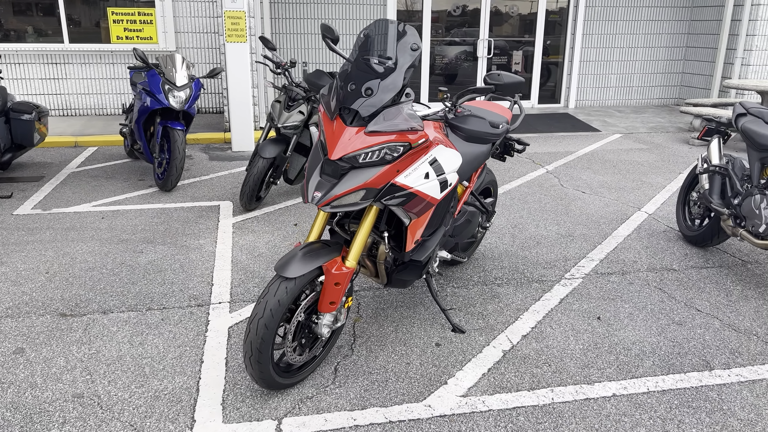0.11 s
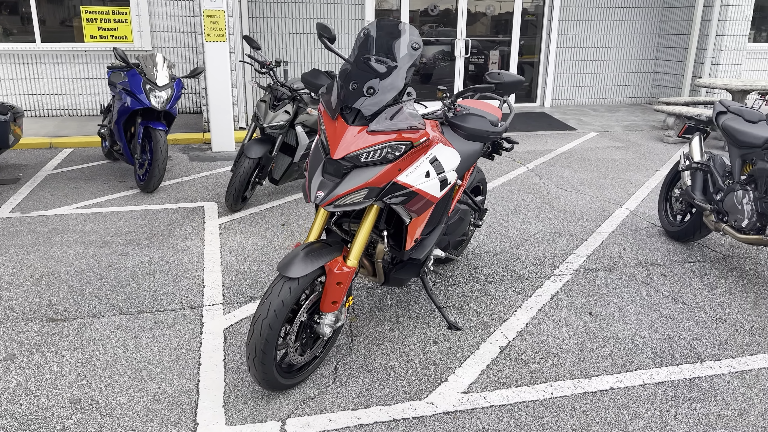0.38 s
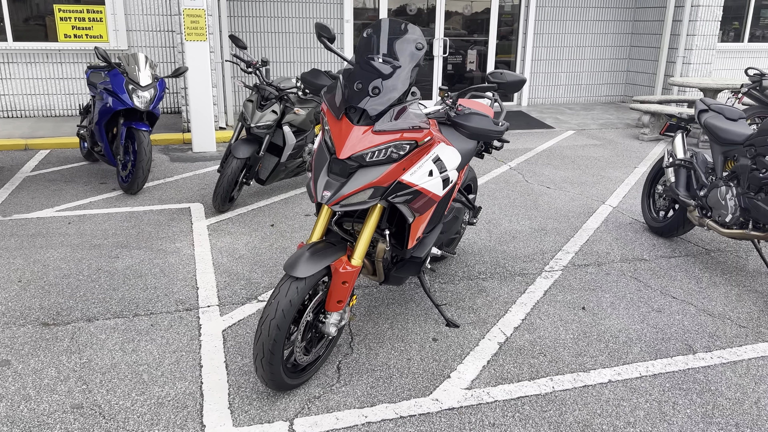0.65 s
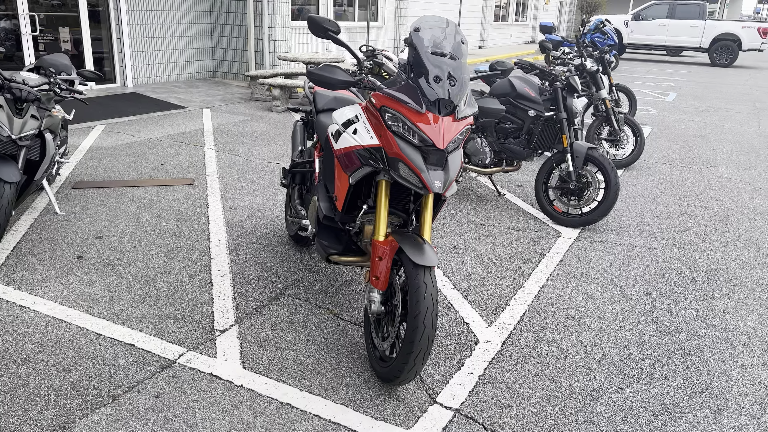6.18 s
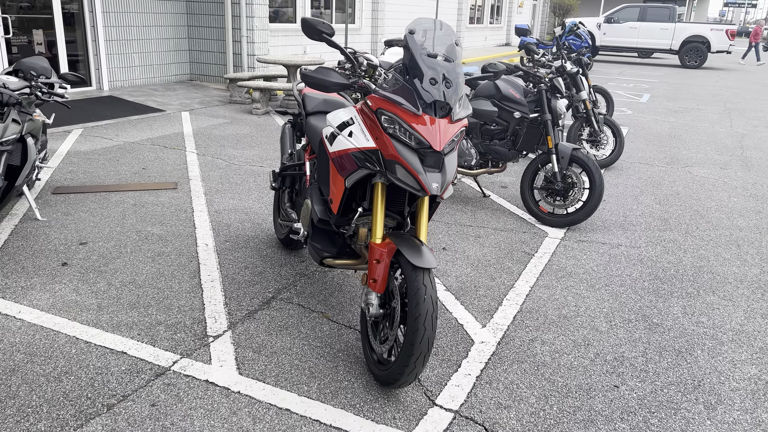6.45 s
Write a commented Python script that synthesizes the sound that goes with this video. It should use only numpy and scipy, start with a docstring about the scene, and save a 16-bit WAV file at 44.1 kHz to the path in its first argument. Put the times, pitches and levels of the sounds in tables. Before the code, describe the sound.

Outdoors in a car park, gusty wind strikes a hand-held stereo microphone with low buffeting, fluttering and dense irregular pops, strongest around the middle. A few tiny taps touch the case early, and an idling engine ticks very faintly to the right. Behind it, soft road roar and tyre hiss slowly grow; the pops thin out and a vehicle's low exhaust drone swells close by in the final second.

```python
"""Gusty wind buffets and pops on the two ports of a hand-held stereo microphone in a car park.
Shaped noise makes the wind, brief wave packets its pops, and damped sines a few taps on the case.
An idling engine ticks faintly to the right as hiss pulses. A vehicle draws near on the road: noise bands
for roar and hiss, with sine tones for the swelling exhaust drone. The recorder's bass filters smear every
pop into a short falling chirp."""
import sys
import numpy as np
from scipy import signal
from scipy.fft import rfft, irfft, next_fast_len
from scipy.io import wavfile
from scipy.ndimage import uniform_filter1d, map_coordinates

SR = 44100
rng = np.random.default_rng(int(sys.argv[2]) if len(sys.argv) > 2 else 0)


def wav_out(sig):
    """Save sig, one row per channel (or a flat mono array), as 16-bit PCM at SR to the path in sys.argv[1]."""
    wavfile.write(sys.argv[1], SR, np.round(np.clip(np.atleast_2d(sig).T, -1, 1) * 32767).astype(np.int16))


def field_ratio(decibels):
    """Amplitude ratio for a level in dB (20 dB per decade); scalars and array-likes work."""
    return 10 ** (np.asarray(decibels, dtype=float) / 20)


N = 289737

# gust strength at the ports: (time [s], buffet level [dB])
GUSTS = [(0, -34), (.2, -30), (.45, -25), (.66, -29.5), (.75, -27), (1.2, -25), (1.36, -29.5), (1.6, -24),
         (1.88, -28.5), (2.2, -19.5), (2.33, -27.5), (2.5, -19), (2.63, -25.5), (2.88, -23.5), (3.12, -29),
         (3.62, -30.5), (3.93, -28.5), (4.57, -28.5), (4.87, -29.5), (5.1, -33), (5.6, -26), (6.57, -26.5)]
# wind spectra: (frequency [Hz], relative level [dB])
BUFFET_SPECTRUM = [(15, -62.5), (25, -15.5), (45, -2), (69, 3), (144, -7), (188, -6.5), (400, -17.5),
                   (520, -33.5), (880, -120)]
FLUTTER_SPECTRUM = [(150, -17.5), (300, -3.5), (450, -4.5), (800, -8), (1500, -13.5), (4000, -120)]
# likeness of the two ports, for wind and for distant sounds: (frequency [Hz], correlation [-1 to 1])
WIND_ALIKE = [(60, 0.66), (300, 0.58), (900, 0.91)]
FAR_ALIKE = [(100, 0.81), (500, 0.2), (2000, 0.22), (5000, 0.3), (8000, 0.23)]
# distance of the vehicle: (time [s], distance [m])
DISTANCE = [(0, 40), (.72, 38.5), (2.08, 32.5), (2.3, 32.8), (3.04, 28.1), (4.31, 21.2), (5.11, 23.4),
            (5.52, 15.6), (6.57, 17.9)]
# where the vehicle is heard: (time [s], lag of the right port [ms])
BEARING = [(0, -0.59), (5.9, -0.43), (6.1, 0.34)]
# spectra of road roar, tyre sizzle, exhaust rumble, traffic growl above it, and a brighter rush
# of air and tyres: (frequency [Hz], relative level [dB])
ROAR_SPECTRUM = [(200, -37), (500, -14.5), (700, -5.5), (950, 2), (1500, -6.5), (2200, -8.5), (2900, -14),
                 (3500, -26), (7000, -120)]
SIZZLE_SPECTRUM = [(1000, -120), (2500, -32), (3200, -5), (4200, -6), (5200, -9.5), (7200, -12.5),
                   (9300, -21), (11400, -18), (13400, -35.5), (15500, -27)]
RUMBLE_SPECTRUM = [(25, -44), (60, -14), (110, 1.5), (240, 3), (330, -12), (600, -12), (2500, -120)]
GROWL_SPECTRUM = [(150, -51), (280, -3), (380, 5.5), (480, -3.5), (700, -20), (2500, -120)]
WHOOSH_SPECTRUM = [(1200, -43), (1900, 3), (2700, -2.5), (3600, -13.5), (6000, -37)]
# exhaust rumble, and low growl of traffic above it: (time [s], rumble level [dB], growl level [dB])
RUMBLE_AND_GROWL = [(0, -40, -33), (.6, -73.5, -40), (3.3, -61, -49.5), (3.85, -35, -35), (5.05, -35, -59),
                    (5.22, -42, -32), (5.42, -22.5, -33), (6.0, -25.5, -36.5), (6.2, -25.5, -50),
                    (6.57, -20.5, -29)]
# rises of the brighter rush: (time [s], half width [s], peak level [dB])
WHOOSHES = [(3.62, 0.22, -45.5), (4.66, .07, -46.5), (5.3, 0.12, -43.5)]
# swell of the roar as the vehicle passes: (time [s], half width [s], gain [dB])
ROAR_SWELL = (6.35, 0.29, 4.5)
# ticking of the idling engine: (time [s], level [dB])
IDLE_LEVEL = [(0, -94), (.6, -66.5), (1.2, -70), (1.6, -76), (1.82, -61), (1.95, -69.5), (2.1, -61.5),
              (2.4, -77), (3.0, -90)]
# its speed, settling: (time [s], turns a second [Hz])
IDLE_SPEED = [(1, 21.4), (1.06, 20.9)]
# tone of its ticks: (frequency [Hz], relative level [dB])
TICK_SPECTRUM = [(2000, -24), (4000, 2.5), (6500, 2.5), (8000, -2.5), (11500, -2.5), (14000, -21.5)]
# single eddies bursting, levels before the trims in pops():
# (time [s], thump level [dB], snap level [dB], snap pitch [Hz])
POPS = [(0.211, -12, -14.5, 360), (0.434, -21, -12, 393), (0.518, -13, -15, 410), (0.528, -14, -13, 566),
        (0.568, -25, -13, 450), (0.599, -31, -13.5, 450), (0.693, -16, -9, 627), (0.718, -5, -11, 400),
        (0.727, -15.5, -11.5, 353), (0.743, -28, -16, 610), (0.771, -23, -18, 580),
        (0.828, -22, -14.5, 450), (0.841, -7.5, -28, 427), (0.89, -11.5, -18.5, 500),
        (0.988, -28, -14.5, 460), (1.015, -15, -11, 420), (1.027, -27, -12.5, 600), (1.05, -17, -12, 458),
        (1.075, -10.5, -26, 383), (1.116, -29, -17.5, 493), (1.176, -16.5, -14.5, 480),
        (1.203, -13, -27, 430), (1.269, -16.5, -19.5, 470), (1.451, -9.5, -13, 430),
        (1.472, -13, -6.5, 476), (1.517, -17.5, -9.5, 358), (1.551, -8, -12, 380), (1.676, -19.5, -15, 510),
        (1.793, -9, -16.5, 520), (1.905, -24, -17.5, 493), (1.966, -11, -17.5, 530), (2.003, -24, -20, 600),
        (2.027, -21.5, -11, 644), (2.067, -25, -11, 507), (2.081, -26.5, -15.5, 492),
        (2.118, -26.5, -15.5, 650), (2.189, -15, -12.5, 410), (2.22, -17.5, -16, 434),
        (2.328, -5.5, -10.5, 470), (2.545, -1.5, 0.5, 390), (2.564, 4.5, -3, 373), (2.669, -15, -9, 476),
        (2.684, -19, -6.5, 620), (2.719, -15, -17, 435), (2.757, -19.5, -11, 515),
        (2.825, -14.5, -25.5, 343), (2.866, -6.5, -24, 290), (2.992, 2, -12.5, 317),
        (3.032, -14.5, -9, 530), (3.207, -8, -11, 344), (3.261, -10, -16, 500), (3.975, -17.5, -16.5, 523),
        (4.266, -22, -18.5, 423), (4.553, -13, -17, 320), (4.673, -18, -14.5, 340), (4.716, -22, -10, 393),
        (4.947, -8.5, -15.5, 330), (5.513, -5, -40, 380), (5.87, -7.5, -17, 292), (6.411, -5, -18.5, 450)]
# taps on the case: (time [s], pitch [Hz], level before onset and decay [dB])
KNOCKS = [(1.029, 1650, -24), (1.968, 1500, -30), (2.018, 1700, -29)]
# exhaust tones: (start [s], length [s], multiple of the cycle rate, level [dB])
EXHAUST = [(2.215, 0.23, 6, -23.5), (4.197, 0.25, 9, -32), (4.736, 0.2, 6, -33.5), (5.117, 0.26, 9, -32),
           (5.378, 0.23, 6, -28), (5.459, 0.62, 5, -25.5), (5.5, 0.16, 9, -31.5), (5.56, 0.49, 3, -19.5),
           (5.892, 0.34, 2, -25), (5.995, 0.36, 9, -32), (6.113, 0.4, 3, -20), (6.334, 0.65, 5, -25),
           (6.39, 0.16, 7, -28)]
# engine cycle rate of the vehicle: (time [s], rate [Hz])
CYCLE = [(2.3, 30.42), (4.3, 30.05), (5.2, 29.6), (5.8, 30.38), (6.57, 28.95)]
# the microphone body: (frequency [Hz], left minus right [dB])
TILT = [(300, 0), (650, -1.5), (1100, 1.5), (2300, 2.5), (3500, -1), (5500, -6.5), (7500, -2.5),
        (9000, -0.5)]
# treble lost from the centre (above 0) or from the sides (below 0): (frequency [Hz], loss [dB])
TREBLE_LOSS = [(8500, 0), (9100, 11.5), (10100, 14), (10700, -0.5), (11300, -18), (12300, -20.5),
               (13000, 4.5)]

PORT_MS = -0.49  # lag of the right port for sounds from the road; negative means it hears them first
FLUTTER_DB, FLUTTER_GROWS = -37, 0.95  # level in a middling gust; dB of swing for each dB of gust
LULL_DB, FLUTTER_LUMPS_DB = 5, 2.4  # swing of the wind, and of the flutter on top, for each unit of wobble
LUMP_TOP = .5  # how far the wobble may rise in a lump of wind
VEER_S, CONTRARY = 2.5, .25  # bursts strike from the right, then from the left; share that do the opposite
SURE_DB = -9  # listed snaps at or above this always come with the wind
LEFT_FIRST_MS, RIGHT_FIRST_MS = 0.43, 0.21  # how long a burst takes to reach the other port
SHARPEN_PER_DB = .006  # harder snaps are shorter: cycles lost for each dB
SPIT_DB = -16  # a brighter edge an octave above each snap, against its listed level
ROAR_DB = -31  # at 10 m, before the swell
SIZZLE_DB, SIZZLE_LOSS_DB_PER_M = -38.5, 0.282  # at 10 m before the loss; extra treble loss on the way
WAVER_DB, TICK_SCATTER_DB = 1.2, 1.5  # unsteadiness of the engine and traffic; of the tick sizes
FIRST_TICK_S = .103  # when the idling engine begins to turn over


def unit(x):
    """Scaled to rms 1."""
    return x / np.sqrt(np.mean(x ** 2) + 1e-20)


def along(points, hz):
    """Value at each frequency between (Hz, value) points on a log axis."""
    f, v = np.transpose(points)
    return np.interp(np.log(hz + 1), np.log(f + 1), v)


def curves(rows):
    """One value per sample for each column after the time."""
    s, *cols = np.transpose(rows)
    return [np.interp(np.arange(N) / SR, s, c) for c in cols]


def wobble(rate):
    """A smooth random curve, rate knots a second."""
    knots = rng.standard_normal(int(N * rate / SR) + 4)
    return map_coordinates(knots, [np.arange(N) * rate / SR])


def filtered(x, response):
    """x times a complex response of frequency."""
    m = next_fast_len(N + SR // 2)
    return irfft(rfft(x, m) * response(np.fft.rfftfreq(m, 1 / SR)), m)[..., :N]


def shaped(x, spectrum):
    """x given the levels of a spectrum table."""
    return filtered(x, lambda hz: field_ratio(along(spectrum, hz)))


def ports(pair, alike):
    """Two unrelated signals mixed so that left and right are alike by the given share."""
    turn = lambda hz: np.arccos(np.clip(along(alike, hz), -1, 1)) / 2
    mid, side = filtered(pair, lambda hz: np.array([np.cos(turn(hz)), np.sin(turn(hz))]))
    return np.array([mid + side, mid - side])


def lagged(x, ms):
    """The right port hears it ms later, half the lag on each side."""
    shift = ms * SR / 2000
    left = map_coordinates(x[0], [np.arange(N) + shift])
    right = map_coordinates(x[1], [np.arange(N) - shift])
    return np.array([left, right])


def rush(spectrum, patchy_db):
    """Two shaped noises of rms 1 with patches of random gain in time and frequency."""
    z = signal.stft(rng.standard_normal((2, N)), nperseg=512)[2]
    field = uniform_filter1d(rng.standard_normal(z.shape[1:]), size=6, axis=0)
    field = uniform_filter1d(field, size=12, axis=1)
    pair = signal.istft(z * field_ratio(patchy_db * unit(field)), nperseg=512)[1][:, :N]
    return unit(shaped(pair, spectrum))


def eddies(rate, spread_db, noise):
    """Random pressure kicks of scattered size, rate a second, over plain turbulence."""
    struck = rng.random((2, N)) < rate / SR
    size = rng.standard_normal((2, N)) * field_ratio(spread_db * rng.standard_normal((2, N)))
    return unit(struck * size) + noise * rng.standard_normal((2, N))


def wind():
    """Turbulence in lumps: the same eddies drive a low buffet and a lighter flutter."""
    buffet_db, = curves(GUSTS)
    flutter_db = FLUTTER_DB + FLUTTER_GROWS * (buffet_db - buffet_db.mean())
    lumps = field_ratio(LULL_DB * np.minimum(wobble(26), LUMP_TOP))
    drive = ports(eddies(rate=140, spread_db=1.5, noise=1.5) * lumps, WIND_ALIKE)
    buffet = unit(shaped(drive, BUFFET_SPECTRUM))
    flutter_lumps = field_ratio(FLUTTER_LUMPS_DB * np.minimum(wobble(30), 2 * LUMP_TOP))
    flutter = unit(shaped(drive * flutter_lumps, FLUTTER_SPECTRUM))
    return lagged(field_ratio(buffet_db) * buffet + field_ratio(flutter_db) * flutter, -0.38)


def road():
    """Roar, exhaust and a growl of traffic share one moving bearing; tyre sizzle comes off the whole road."""
    t = np.arange(N) / SR
    metres, = curves(DISTANCE)
    bearing_ms, = curves(BEARING)
    spread_db = -20 * np.log10(metres / 10)
    swell_s, swell_half, swell_db = ROAR_SWELL
    roar_db = ROAR_DB + spread_db + swell_db * np.exp(-((t - swell_s) / swell_half) ** 2)
    sizzle_db = SIZZLE_DB + spread_db - SIZZLE_LOSS_DB_PER_M * metres
    rumble_db, growl_db = np.array(curves(RUMBLE_AND_GROWL)) + WAVER_DB * wobble(19)
    whoosh_gain = sum(field_ratio(db) * np.exp(-((t - s) / half) ** 2) for s, half, db in WHOOSHES)

    rumble = field_ratio(rumble_db) * rush(RUMBLE_SPECTRUM, WAVER_DB)
    growl = field_ratio(growl_db) * rush(GROWL_SPECTRUM, WAVER_DB)
    roar = field_ratio(roar_db + 0.35 * wobble(8.9)) * rush(ROAR_SPECTRUM, patchy_db=.8)
    whoosh = whoosh_gain * rush(WHOOSH_SPECTRUM, WAVER_DB)
    sizzle = field_ratio(sizzle_db + 0.29 * wobble(6.9)) * rush(SIZZLE_SPECTRUM, patchy_db=2.0)

    moving = drone() + ports(rumble + growl + roar + whoosh, FAR_ALIKE)
    return lagged(moving, bearing_ms) + lagged(ports(sizzle, FAR_ALIKE), PORT_MS)


def idle_ticks():
    """Valve gear: a short hiss once per turn, never twice the same size."""
    running = np.arange(N) > FIRST_TICK_S * SR
    turns = np.cumsum(curves(IDLE_SPEED)[0] * running) / SR
    size_db = TICK_SCATTER_DB * rng.standard_normal(N // 1000)[turns.astype(int)]
    pulse = (turns % 1) / 0.087  # each hiss peaks 0.087 of a turn in
    tick = field_ratio(size_db) * pulse * np.exp(-pulse) * rng.standard_normal((2, N))
    tick = ports(shaped(tick, TICK_SPECTRUM), [(5000, 0.61)])
    return field_ratio(curves(IDLE_LEVEL)[0]) * lagged(unit(tick), PORT_MS)


def pops():
    """Each burst, a dull thump, a pitched snap and its spit, strikes one port first, with a weaker kick near."""
    s, thump_db, snap_db, snap_hz = np.transpose(POPS)
    chance = rng.random((len(s), 6))
    contrary = (chance[:, 5] < CONTRARY) & (snap_db < SURE_DB)
    left_first = (s > VEER_S) != contrary
    lag_s = np.outer([-.5, .5], np.where(left_first, LEFT_FIRST_MS, -RIGHT_FIRST_MS)) / 1000
    # the weaker kick falls before or after the main one
    echo_s = (0.00264 + 0.00891 * chance[:, 2]) * np.sign(chance[:, 4] - .4)
    side = field_ratio(np.outer([1, -1], 2 * (chance[:, 1] - .5)))[..., None]
    span = np.arange(-SR // 40, SR // 40)
    at = np.round(s * SR).astype(int)[:, None] + span
    same = np.ones(len(s))
    snap_cycles = np.clip(.26 - SHARPEN_PER_DB * snap_db, .15, 1)
    # (level [dB], pitch [Hz], spread [cycles], weaker kick against the main one [dB])
    thump = (thump_db - 4.0, 140 * same, .28 * same, -14)
    snap = (snap_db - .8, snap_hz, snap_cycles, -11)
    spit = (snap_db + SPIT_DB, 2 * snap_hz, .5 * same, -2)
    out = np.zeros((2, N))
    for db, hz, cycles, after_db in (thump, snap, spit):
        for late_s, gain_db, turn in ((0, db, chance[:, 0]), (echo_s, db + after_db, chance[:, 3])):
            u = (span / SR - (lag_s + late_s)[..., None]) * hz[:, None]  # time in cycles
            wave = np.cos(2 * np.pi * (u + turn[:, None])) * np.exp(-(u / cycles[:, None]) ** 2 / 2)
            kick = side * field_ratio(gain_db)[:, None] * wave
            out += [np.bincount(at.ravel(), port.ravel(), N) for port in kick]
    return out


def knocks():
    """Light taps on the plastic case: one mode that dies in a few milliseconds."""
    out, t = np.zeros(N + SR), np.arange(SR // 20) / SR
    for s, hz, db in KNOCKS:
        envelope = field_ratio(db - 60 * t / 0.011) * (1 - np.exp(-t / 0.00018))
        out[round(s * SR):][:len(t)] += envelope * np.sin(2 * np.pi * hz * t)
    return out[:N]


def drone():
    """Exhaust tones swell and fade as their paths to the microphone add up or cancel."""
    t, out, cycle_hz = np.arange(N) / SR, 0, curves(CYCLE)[0]
    for start, length, order, db in EXHAUST:
        u = np.clip((t - start) / length, 0, 1)
        swell = np.abs(np.sin(np.pi * u)) ** 0.34
        hz = order * cycle_hz * (1 + 0.006 * wobble(12))
        tone = np.sqrt(2) * np.sin(2 * np.pi * (np.cumsum(hz) / SR + rng.random()))
        out = out + field_ratio(db + WAVER_DB * wobble(25)) * swell * tone
    return out


def treble_losses(x):
    """Bands near 9-10 kHz are lost from the centre (left plus right), near 11-12 kHz from the sides."""
    keep = lambda hz: field_ratio(np.minimum(0, np.outer([-1, 1], along(TREBLE_LOSS, hz))))
    mid, side = filtered(np.array([x[0] + x[1], x[0] - x[1]]) / 2, keep)
    return np.array([mid + side, mid - side])


def scene():
    """Wind on the ports and taps on the case, engines beyond."""
    return wind() + road() + idle_ticks() + pops() + knocks()


def top_cut(x):
    """Nothing passes above the cut-off."""
    return signal.sosfilt(signal.butter(12, 15720, fs=SR, output="sos"), x)


def record(dry):
    """Bass filters delay each frequency by about two of its own cycles; the body tilts left against right."""
    smear = lambda hz: np.exp(-2j * np.pi * 1.9 * np.log(np.clip(hz, 30, 1500) / 1500))
    tilt = lambda hz: field_ratio(np.outer([.5, -.5], along(TILT, hz)))
    low_cut = lambda hz: 1 / np.sqrt(1 + (45 / (hz + 1)) ** 8)
    heard = filtered(dry, lambda hz: smear(hz) * tilt(hz) * low_cut(hz))
    return top_cut(treble_losses(heard))


dry = scene()
out = record(dry)
wav_out(out)
```